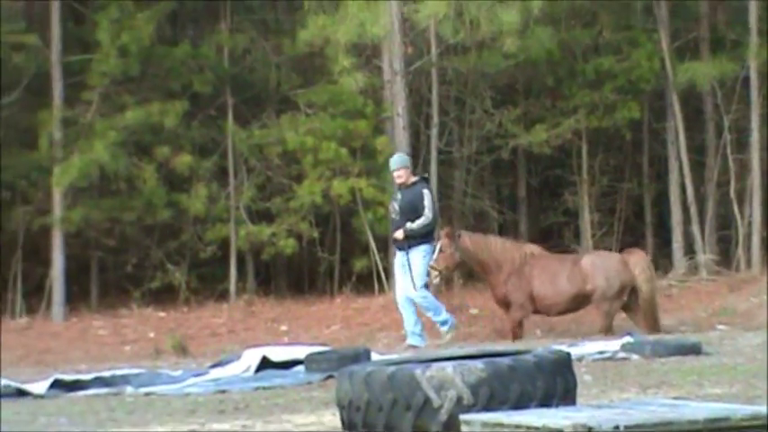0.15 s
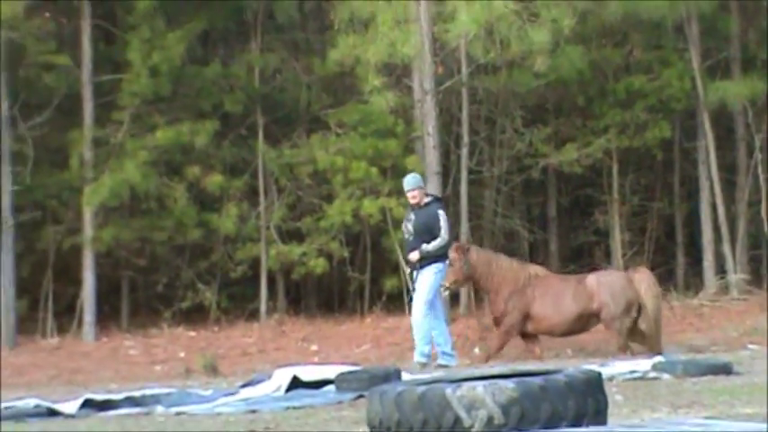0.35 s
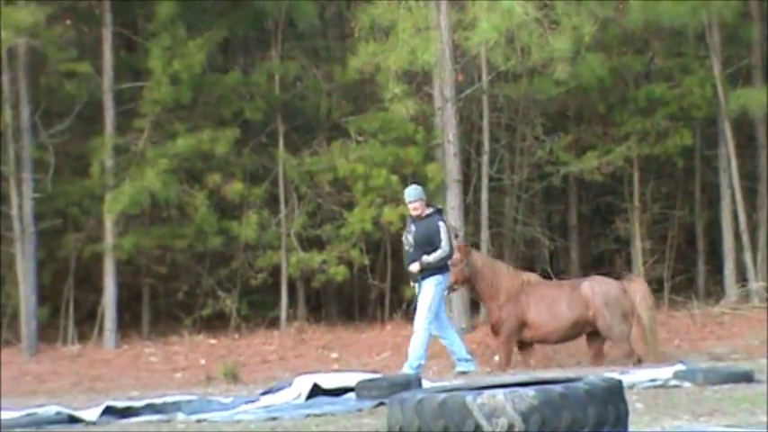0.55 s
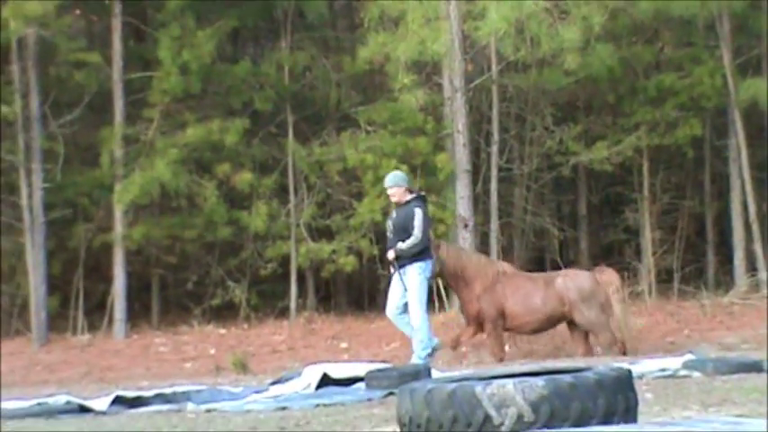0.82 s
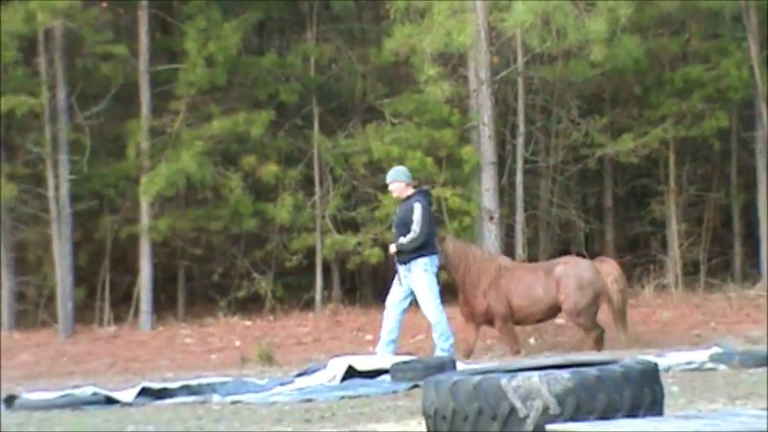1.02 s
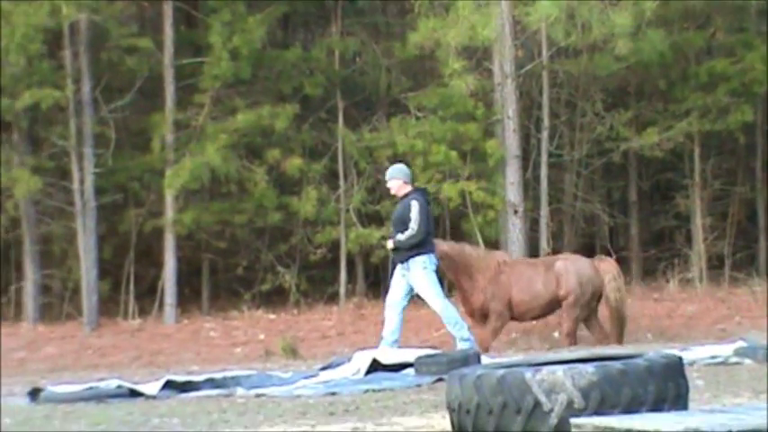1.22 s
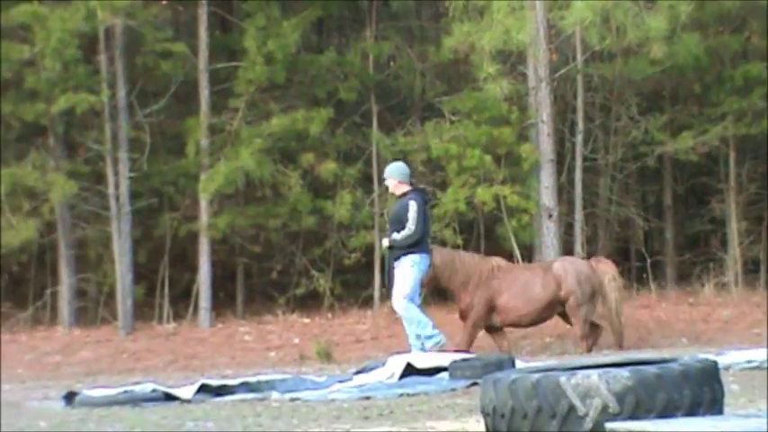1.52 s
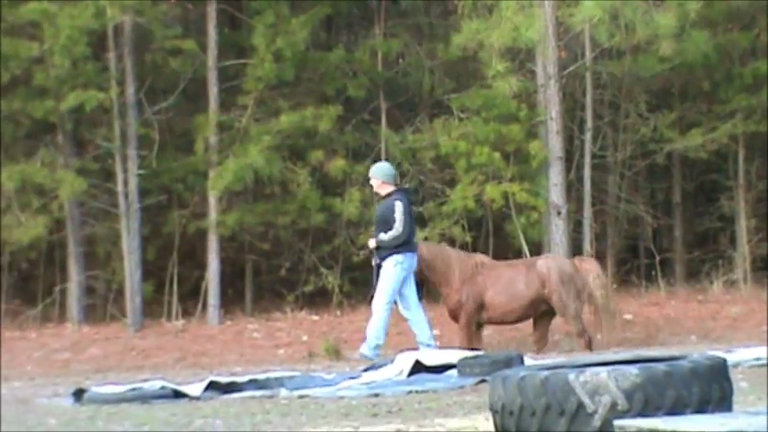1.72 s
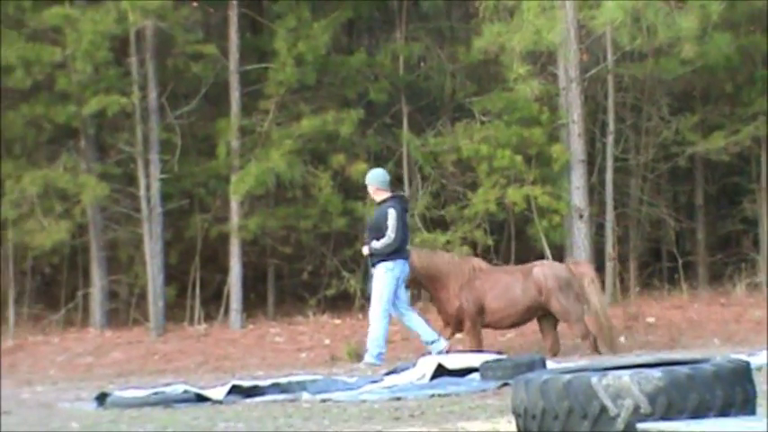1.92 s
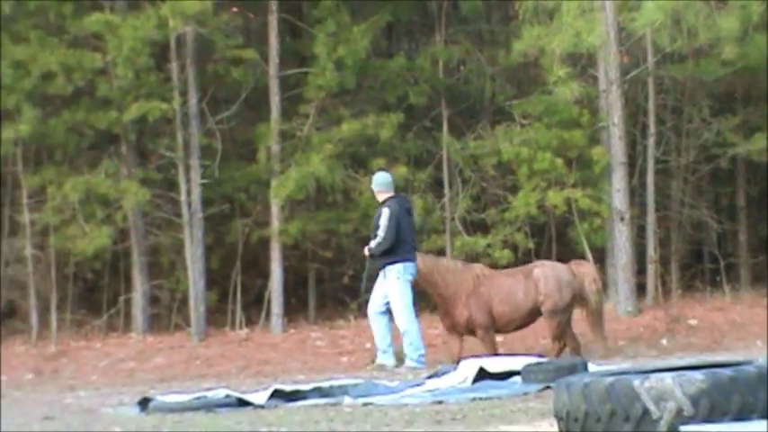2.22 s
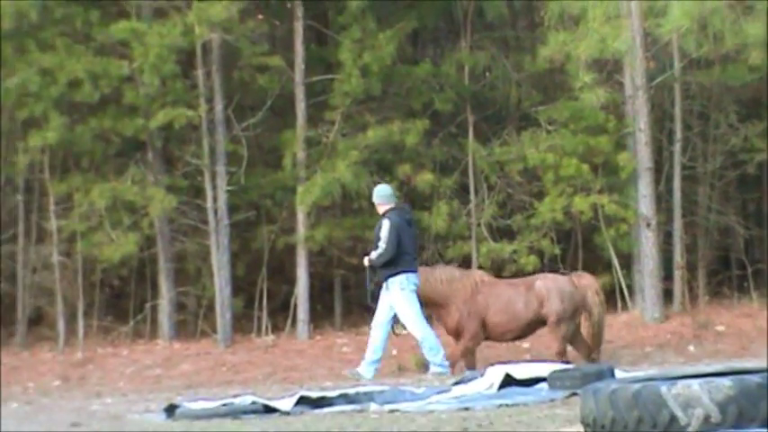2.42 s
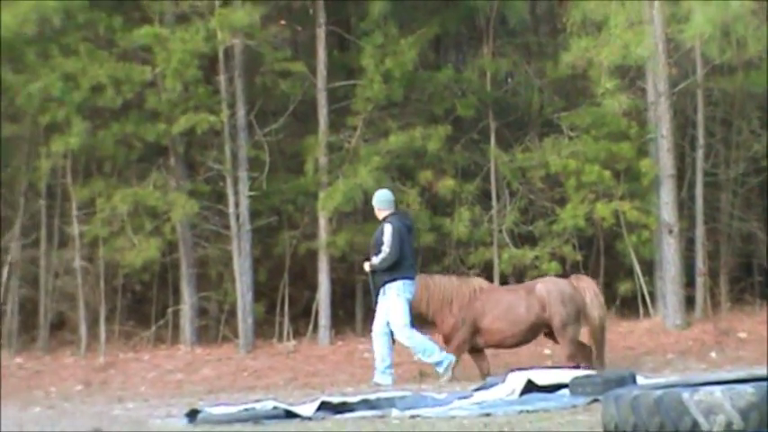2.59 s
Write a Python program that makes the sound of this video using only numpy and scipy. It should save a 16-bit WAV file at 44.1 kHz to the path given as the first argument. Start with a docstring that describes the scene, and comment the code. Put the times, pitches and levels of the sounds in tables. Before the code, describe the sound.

Outdoors beside trees, a single horse neigh starts as a shrill two-toned whistle, sinks into raspy shuddering heaves and grunts, then snorts; woodland echoes, a small clink, low rumble and microphone hiss, horse slightly left.

```python
"""An open yard beside pine woods, with distant rumble, microphone hiss and a faint steady whine.
A horse whinnies once, a little left of the microphone: a wavering two-toned whistle turns hoarse, breaks into
heaves about seven times a second with low grunts mostly between them, and ends in a snort and a clink of metal.
Whistles are near-sines; the rasp, grunts and snort are pulses or noise through resonances of throat, chest and
nose; the trees scatter the call back as random echoes that differ between left and right."""
import sys
import numpy as np
from scipy import signal
from scipy.fft import rfft, irfft
from scipy.io import wavfile

SR = 44100
rng = np.random.default_rng(int(sys.argv[2]) if len(sys.argv) > 2 else 0)


def to_wav(s):
    """Save 16-bit WAV."""
    ch = np.atleast_2d(s).T  # columns
    pcm = np.round(np.clip(ch, -1, 1) * 32767)  # PCM
    wavfile.write(sys.argv[1], SR, pcm.astype(np.int16))


def gain_from_db(level_db):
    """Convert decibel levels to linear amplitude factors (20 dB per decade)."""
    decades = np.asarray(level_db, float) / 20
    return 10 ** decades


N = 121275


def read(points, hz):
    """Value of a spectrum table, interpolated on a log frequency axis."""
    f, value = np.transpose(points)
    return np.interp(np.log(hz + 1), np.log(f + 1), value)


def curve(rows):
    """Columns of a time table at every sample."""
    rows = np.array(rows)
    return [np.interp(np.arange(N) / SR, rows[:, 0], column) for column in rows[:, 1:].T]


def evened(x):
    """Scales to rms 1."""
    return x / np.sqrt(np.mean(x ** 2) + 1e-20)


def wander(rate_hz):
    """Smooth random motion of rms 1, low-passed at rate_hz."""
    return evened(signal.lfilter(*signal.butter(2, rate_hz, fs=SR), rng.standard_normal(N)))


def swing(hz, spread):
    """A cosine of uneven rate."""
    rate = hz * np.exp(spread * wander(12.34))
    return np.cos(2 * np.pi * np.cumsum(rate) / SR)


def resonate(x, hz, width):
    """A steep two-pole resonance that follows hz: shift down to zero, low-pass, shift back."""
    turn = np.exp(2j * np.pi * np.cumsum(hz * np.ones(len(x))) / SR)
    r = np.exp(-np.pi * width / SR)
    smooth = signal.lfilter([(1 - r) ** 2], [1, -2 * r, r * r], x / turn)
    return 2 * (turn * smooth).real


def pulses(hz, jitter):
    """One click for each uneven flap of the vocal folds."""
    turns = np.cumsum(hz * np.exp(jitter * wander(90))) / SR
    return evened(np.diff(np.floor(turns), prepend=0))


# Rumble and hiss at the microphone: f/Hz, relative level/dB per Hz
YARD_SPECTRUM = [(12, -64), (20, -14.5), (93, -6.5), (176, -15), (254, -18.5), (375, -20), (456, -24.5),
                 (819, -22.5), (1510, -32.5), (1890, -28.5), (7020, -42), (15800, -43.5)]
# Likeness of the left and right background: f/Hz, correlation
YARD_LIKENESS = [(60, .9994), (130, .992), (300, .85), (6000, .72), (10000, .74), (15000, .88)]
YARD_DB = -44.5  # rms of rumble and hiss
WHINE_HZ, WHINE_DB = 15734, -77  # rms


def yard():
    """Distant rumble and microphone hiss as shaped, partly shared stereo noise, with a faint whine."""
    frames, hz = N // 512 + 5, np.fft.rfftfreq(2048, 1 / SR)
    a, b, c, d = rng.standard_normal((frames, 1025, 4)).T
    left, other = a + 1j * b, c + 1j * d
    same = np.clip(read(YARD_LIKENESS, hz), -1, 1)[:, None]
    right = same * left + np.sqrt(1 - same ** 2) * other
    spectrum = np.array([left, right]) * gain_from_db(read(YARD_SPECTRUM, hz))[:, None]
    noise = signal.istft(spectrum, nperseg=2048, noverlap=1536)[1][:, :N]
    whine = np.sqrt(2) * gain_from_db(WHINE_DB) * np.sin(2 * np.pi * WHINE_HZ * np.arange(N) / SR)
    return gain_from_db(YARD_DB) * evened(noise) + whine


# The hoarse voice: t/s, relative level/dB of the effort, throat shape (0 tight - 1 slack)
HOARSE_EFFORT = [(.1, -54.5, 0.0071), (.25, -36.5, 0.074), (.45, -33, 0.086), (.8, -31, 0.074),
                 (1.1, -28.5, 0.27), (1.5, -30.5, 0.44), (1.85, -30.5, 0.52), (2.2, -31, 0.92),
                 (2.33, -34, 1), (2.41, -34, 0.76), (2.5, -33.5, 1), (2.62, -42.5, 0.95)]
# Resonances of throat and mouth: f/Hz tight, f/Hz slack, width/Hz, relative level/dB tight,
# relative level/dB slack, swing/dB each way in a heave of strength 1
THROAT_RESONANCES = [(752, 670, 190, -8.5, -7, 1), (1230, 1197, 253, -8, -2.5, 2.5),
                     (1704, 1476, 144, -5.5, -6, 4), (1898, 1644, 70, 0, -8.5, 0.5),
                     (2144, 2010, 520, 2.5, -1.5, 1), (2700, 2910, 120, -11.5, -41, -2),
                     (3050, 2933, 240, -14.5, -9, 1), (3650, 3430, 910, -8.5, -6, 3),
                     (3512, 3250, 127, -14, -12, 1.5), (4420, 4380, 1180, -9, -8.5, 3),
                     (4640, 4300, 260, -16.5, -25, 0), (5340, 5400, 770, -14.5, -21.5, 2.5),
                     (6780, 6300, 1100, -19, -27, 3.5), (8200, 7000, 2600, -24, -27, 1.5)]
# Heaves of breath: t/s, strength
HEAVE_TIMES = [(.65, 0.28), (0.769, 0.53), (0.899, 0.74), (1.04, 0.65), (1.161, 0.64), (1.293, 0.67),
               (1.422, 0.99), (1.549, 0.86), (1.704, 0.69), (1.83, 0.83), (1.97, 0.7), (2.11, 1),
               (2.264, 1.15), (2.4, 1.65)]
HEAVE_S = 0.03  # standard deviation of a heave
HEAVE_LIFT = 0.04  # share by which a heave of strength 1 raises the slack resonances
RATTLE_HZ, RATTLE_SHARE, RATTLE_JITTER = 117.8, 0.33, 0.9
THROAT_DRIFT, THROAT_DRIFT_HZ = 0.012, 7  # each resonance strays by this rms share, this fast


def hoarse():
    """Rattle and breath noise through a throat that slackens; heaves raise and mostly brighten it."""
    t = np.arange(N) / SR
    effort_db, slack = curve(HOARSE_EFFORT)
    slack = np.clip(slack, 0, 1)
    heave = sum(k * np.exp(-.5 * ((t - s) / HEAVE_S) ** 2) for s, k in HEAVE_TIMES) - .5
    rattle = RATTLE_SHARE * pulses(RATTLE_HZ, RATTLE_JITTER)
    voice = 0
    for tight_hz, slack_hz, width, tight_db, slack_db, swing_db in THROAT_RESONANCES:
        breath = (1 - RATTLE_SHARE) * rng.standard_normal(N)
        stray = 1 + HEAVE_LIFT * slack * heave + THROAT_DRIFT * wander(THROAT_DRIFT_HZ)
        hz = (tight_hz + (slack_hz - tight_hz) * slack) * stray
        db = tight_db + (slack_db - tight_db) * slack + 2 * swing_db * heave
        voice = voice + gain_from_db(db) * evened(resonate(rattle + breath, hz, width))
    return gain_from_db(effort_db - 6) * voice


# Side pockets of the nose: f/Hz, width/Hz, depth (0 none - 1 full)
NOSE_POCKETS = [(928, 268, 0.72), (2423, 218, 0.83), (486, 180, 0)]


def hollowed(x):
    """Takes out the bands that side pockets of the nose swallow."""
    hz = np.fft.rfftfreq(N, 1 / SR)
    keep = np.prod([1 - min(depth, 1) * np.exp(-.5 * ((hz - f) / (width / 2)) ** 2)
                    for f, width, depth in NOSE_POCKETS], 0)
    return irfft(rfft(x) * keep, N)


# Dying away of the call among the trees: f/Hz, t60/s
TREE_DECAY = [(150, 1), (2000, 1), (5000, 0.24), (12000, 0.43)]
# Echo that differs between the sides: f/Hz, amount beside the shared echo
TREE_SPREAD = [(200, 0.11), (600, 0.74), (2000, 0.95), (8000, 1.25)]
TREES_DB = -3


def trees(x):
    """Random echoes off the trees, partly different for each side, dying by band."""
    # Three layers (shared, left, right), one tap of random sign in every 20 samples
    taps = np.zeros((3, SR))
    at = np.arange(300, SR - 20, 20) + rng.integers(0, 20, (3, (SR - 301) // 20))
    np.put_along_axis(taps, at, rng.choice([-1., 1.], at.shape), 1)
    hz, t, layers = signal.stft(taps, SR, nperseg=256)
    sides = layers[0] + read(TREE_SPREAD, hz)[:, None] * layers[1:]
    fade = gain_from_db(-60 * t / read(TREE_DECAY, hz)[:, None])
    tail = signal.istft(sides * fade, SR, nperseg=256)[1]
    tail = tail / np.linalg.norm(tail[0])
    return gain_from_db(TREES_DB) * signal.fftconvolve(x[None], tail, axes=1)[:, :N]


# Overtones of a whistle: multiple of its pitch, level/dB under the fundamental
TONE_OVERTONES = [(2, -32.5), (4, -45)]
# Uneven beating of the tones: t/s, depth (0-1)
FLUTTER_DEPTH = [(0, .08), (1.3, .15), (1.5, .55)]
# Low folds buzzing under the tones: t/s, depth (0-1)
BUZZ_DEPTH = [(0, .03), (1.0, .1), (1.9, .4), (2.4, 1.0)]
FLUTTER_HZ, BUZZ_HZ = 29, 105  # mid rates


def tone(pitch, level, waver_hz, ring=None):
    """A near-sine whose pitch wavers by waver_hz rms, that beats and buzzes and fades at both ends."""
    start, end = (level[0][0] - .04, -90), (level[-1][0] + 0.05, -90)
    db, = curve([start] + list(level) + [end])
    hz = curve(pitch)[0] + waver_hz * wander(47.2)
    angle = 2 * np.pi * np.cumsum(hz) / SR
    wave = np.sin(angle) + sum(gain_from_db(d) * np.sin(round(k) * angle) for k, d in TONE_OVERTONES)
    if ring:
        ring_hz, ring_width, ring_db = ring
        wave = wave + gain_from_db(ring_db) * resonate(np.sin(2 * angle), ring_hz, ring_width)
    flutter = 1 + curve(FLUTTER_DEPTH)[0] * swing(FLUTTER_HZ, .35)
    buzz = 1 + curve(BUZZ_DEPTH)[0] * swing(BUZZ_HZ, .08)
    return gain_from_db(db) * flutter * buzz * wave


# The whistling voice: t/s, f/Hz
WHISTLE_PITCH = [(.04, 1900), (.15, 1925), (.22, 1930), (.29, 1882), (.45, 1892), (.68, 1880), (.76, 1910),
                 (.82, 1895), (.98, 1888), (1.15, 1895), (1.3, 1860), (1.365, 1868), (1.405, 1800),
                 (1.45, 1870), (1.53, 1850), (1.75, 1900)]
# Its strength: t/s, relative level/dB
WHISTLE_LEVEL = [(0.05, -60), (0.088, -48), (0.156, -33.5), (0.206, -38.5), (0.25, -24.5), (0.28, -31.5),
                 (0.316, -18), (0.36, -30), (0.378, -25.5), (0.416, -17), (0.433, -43), (0.459, -18.5),
                 (0.475, -37), (0.49, -16), (0.512, -35), (0.529, -20.5), (0.548, -35.5), (0.585, -20),
                 (0.614, -24.5), (0.685, -19.5), (0.728, -43), (0.762, -13.5), (0.792, -47), (0.81, -18),
                 (0.89, -26.5), (0.932, -38), (0.951, -41), (0.966, -15), (0.983, -18.5), (1.045, -20),
                 (1.068, -29), (1.088, -23), (1.12, -22.5), (1.137, -54), (1.155, -23), (1.19, -27),
                 (1.247, -36), (1.263, -19), (1.282, -51), (1.294, -22), (1.332, -35.5), (1.357, -20),
                 (1.376, -34), (1.411, -25), (1.443, -33.5), (1.75, -33.5)]
# A second vibration beside it: t/s, f/Hz
SECOND_PITCH = [(.08, 2004), (.3, 2004), (.5, 1975), (.8, 1961), (.88, 2002), (1.0, 1995), (1.3, 1909)]
# Its strength: t/s, relative level/dB
SECOND_LEVEL = [(0.08, -56), (0.13, -44), (0.163, -27.5), (0.208, -35), (0.242, -23.5), (0.29, -37),
                (0.32, -27), (0.354, -32.5), (0.406, -23.5), (0.436, -48), (0.47, -36.5), (0.542, -31),
                (0.596, -26.5), (0.646, -36), (0.7, -25), (0.728, -31), (0.758, -26), (0.79, -28),
                (0.858, -20.5), (0.884, -24), (0.932, -48), (0.996, -26), (1.088, -40), (1.19, -27),
                (1.234, -81), (1.3, -23.5)]


def whistle():
    """The high voice: two nearby vibrations, each wavering on its own."""
    main = tone(WHISTLE_PITCH, WHISTLE_LEVEL, waver_hz=8)
    second = tone(SECOND_PITCH, SECOND_LEVEL, waver_hz=20)
    return main + second


# Grunts: t/s, level/dB, f/Hz of the folds
GRUNT_TIMES = [(1.161, -49.5, 239), (1.328, -47, 257.7), (1.453, -44, 267), (1.61, -41, 261.8),
               (1.749, -44, 245.4), (1.885, -41.5, 243.8), (2.023, -37.5, 200.6), (2.176, -34, 196),
               (2.26, -46, 150.3), (2.336, -39, 132.7), (2.464, -43, 149.8)]
# Chest resonances: f/Hz, width/Hz, relative level/dB
CHEST_RESONANCES = [(146, 140, -7.5), (220, 380, -2), (291, 116, -7)]
# Gullet resonance: f/Hz at a 250 Hz grunt, width/Hz, relative level/dB
GULLET_RESONANCE = (490, 140, 1)
GULLET_FOLLOW = 0.32  # power of the grunt pitch by which the gullet resonance moves
GRUNT_S, GRUNT_JITTER = 0.019, 0.06  # standard deviation of a grunt in s, roughness of its pitch
GRUNT_SAG_PER_S = 2.5  # rate of exponential fall in pitch


def grunts():
    """Short low throbs of the folds through chest and gullet, each on its own sagging pitch."""
    t, rows = np.arange(N) / SR, np.array(GRUNT_TIMES)
    level = sum(gain_from_db(db) * np.exp(-.5 * ((t - s) / GRUNT_S) ** 2) for s, db, hz in GRUNT_TIMES)
    nearest = rows[np.argmin(abs(t[:, None] - rows[:, 0]), axis=1)]
    pitch = nearest[:, 2] * np.exp(-GRUNT_SAG_PER_S * (t - nearest[:, 0]))
    drive = pulses(pitch, GRUNT_JITTER)
    gullet_hz, gullet_width, gullet_db = GULLET_RESONANCE
    gullet = (gullet_hz * (pitch / 250) ** GULLET_FOLLOW, gullet_width, gullet_db)
    body = sum(gain_from_db(db) * evened(resonate(drive, f, width))
               for f, width, db in list(CHEST_RESONANCES) + [gullet])
    return level * evened(body)


# The sinking whistle, dropping near most grunts and climbing near most heaves: t/s, f/Hz
SINKING_PITCH = [(1.5, 1699.5), (1.6, 1621), (1.68, 1655), (1.72, 1702), (1.74, 1389.5), (1.79, 1654.5),
                 (1.85, 1639.5), (1.9, 1337), (1.935, 1629), (1.985, 1641), (2.03, 1232), (2.08, 1560),
                 (2.15, 1220.5), (2.215, 1223), (2.262, 1689), (2.33, 1177.5), (2.38, 1303.5), (2.42, 1382),
                 (2.46, 1502)]
# Its strength: t/s, relative level/dB
SINKING_LEVEL = [(1.5, -28.5), (1.6, -46), (1.681, -36), (1.735, -33.5), (1.77, -50), (1.795, -35),
                 (1.845, -34), (1.87, -39.5), (1.9, -33), (1.92, -38), (1.94, -34.5), (1.989, -35.5),
                 (2.03, -33), (2.082, -40), (2.11, -67), (2.159, -25.5), (2.185, -47), (2.208, -27.5),
                 (2.235, -39.5), (2.262, -41), (2.31, -36), (2.38, -32), (2.421, -35.5), (2.46, -59)]
# The mouth rings on the octave of this whistle: f/Hz, width/Hz, relative level/dB
MOUTH_RING = (3296, 190, 0)


def sinking_whistle():
    """The whistle sinks and leaps in pitch while the mouth rings on its octave."""
    return tone(SINKING_PITCH, SINKING_LEVEL, waver_hz=30, ring=MOUTH_RING)


# The snort: t/s, nose level/dB, mouth level/dB
SNORT_LEVELS = [(2.355, -61, -73), (2.379, -57, -36.5), (2.405, -53.5, -33.5), (2.445, -51, -55),
                (2.47, -47, -41), (2.495, -55, -53), (2.53, -76, -55)]
# Nostril resonances: f/Hz, width/Hz, relative level/dB
NOSTRIL_RESONANCES = [(6990, 540, -6), (9060, 2500, -7.5), (11800, 2500, -18)]
MOUTH_HZ, MOUTH_WIDTH_HZ = 4220, 660


def snort():
    """Gusty air noise bursts from the mouth, then hisses out through the nostrils."""
    gusts = gain_from_db(2.2 * wander(120))
    hiss = evened(sum(gain_from_db(db) * evened(resonate(rng.standard_normal(N), f, width))
                      for f, width, db in NOSTRIL_RESONANCES))
    burst = evened(resonate(rng.standard_normal(N), MOUTH_HZ, MOUTH_WIDTH_HZ))
    nose_db, mouth_db = curve([(0, -120, -120)] + list(SNORT_LEVELS) + [(2.6, -120, -120)])
    return gusts * (gain_from_db(nose_db) * hiss + gain_from_db(mouth_db) * burst)


# Ringing modes of small metal: t/s, f/Hz, level/dB, t60/s
METAL_MODES = [(2.724, 3450, -32, .045), (2.723, 3900, -38, .03), (2.722, 4350, -37, .03)]


def clinks():
    """Brief ringing of a buckle or chain: decaying sines with a 2.4 ms attack."""
    t = np.arange(N) / SR
    out = 0
    for start, hz, db, t60 in METAL_MODES:
        since = np.maximum(t - start, 0)
        attack = np.minimum(since / 0.0024, 1)
        out = out + gain_from_db(db - 60 * since / t60) * attack * np.sin(2 * np.pi * hz * since)
    return out


# Place of the horse and its echoes: f/Hz, left minus right level/dB
HORSE_LEAN = [(200, -0.9), (700, 0.7), (1300, 2.5), (2000, 2.5), (4400, 0.9), (15000, 2)]


def leaning(horse):
    """Sets the horse to the side by a level difference that varies with frequency."""
    half_db = read(HORSE_LEAN, np.fft.rfftfreq(N, 1 / SR)) / 2
    return irfft(rfft(horse) * gain_from_db(np.array([half_db, -half_db])), N)


def scene():
    """The horse and its echoes off the trees, placed in stereo, with clinks over the yard."""
    high, rasp, sink = whistle(), hollowed(hoarse()), hollowed(sinking_whistle())
    low, puff = grunts(), snort()
    high_sides = gain_from_db(np.array([[1.5], [-1.5]]))  # dB: the direct whistle stands further left
    direct = high * high_sides + rasp + sink + low + puff
    # Sends to the trees in dB against each direct sound; the rasp goes in full
    send = gain_from_db(-9) * high + rasp + gain_from_db(-4) * sink + gain_from_db(-12) * low + gain_from_db(-16) * puff
    return leaning(direct + trees(send)) + clinks() + yard()


def band_limit(x):
    """A steep low-pass at the top of the band."""
    return signal.sosfilt(signal.butter(12, 15920, fs=SR, output="sos"), x)


def record(dry):
    """Takes the finished mix to its final form."""
    return band_limit(dry)


dry = scene()
out = record(dry)
to_wav(out)
```